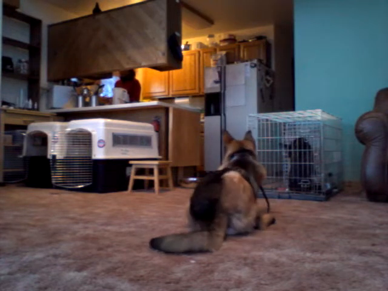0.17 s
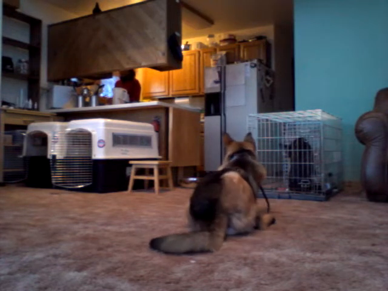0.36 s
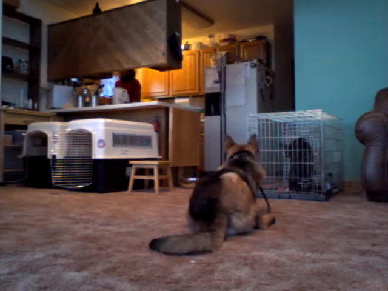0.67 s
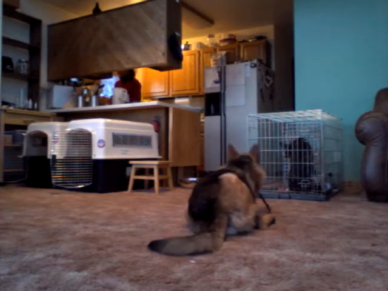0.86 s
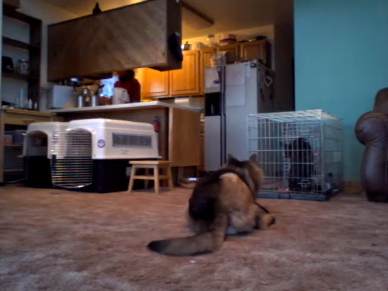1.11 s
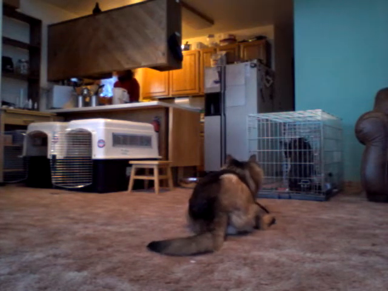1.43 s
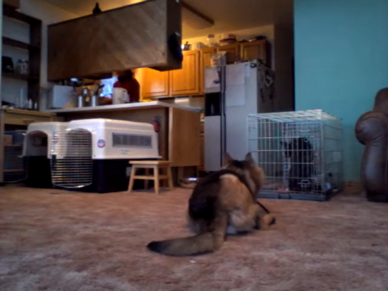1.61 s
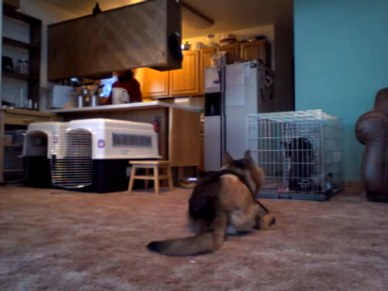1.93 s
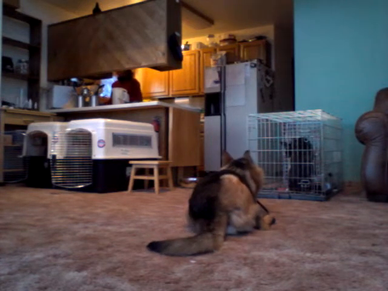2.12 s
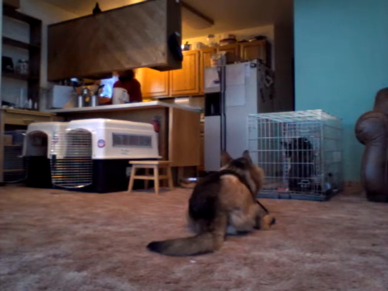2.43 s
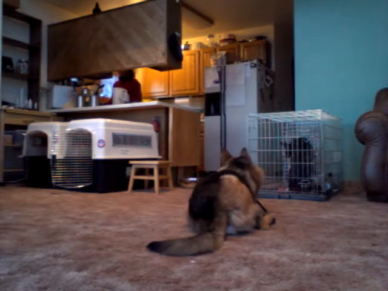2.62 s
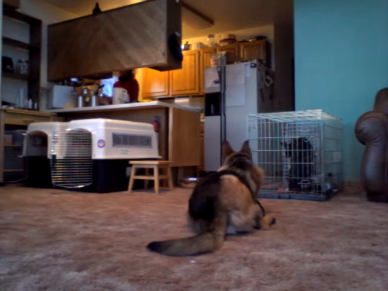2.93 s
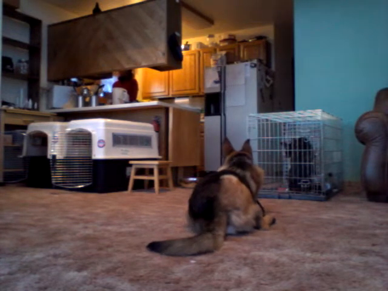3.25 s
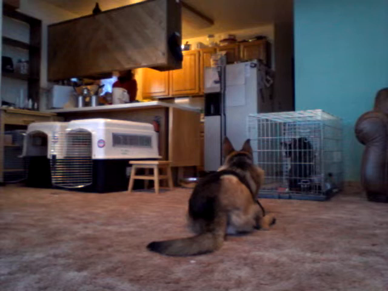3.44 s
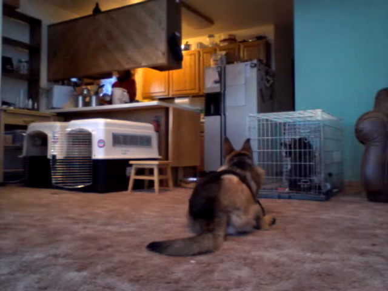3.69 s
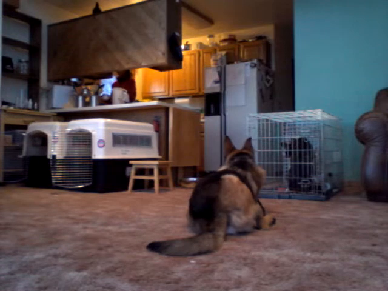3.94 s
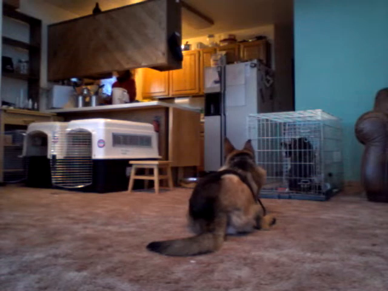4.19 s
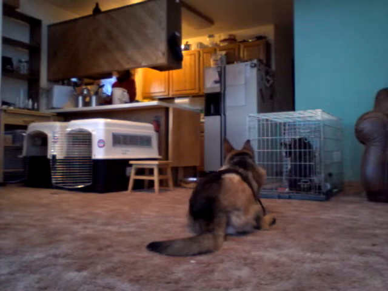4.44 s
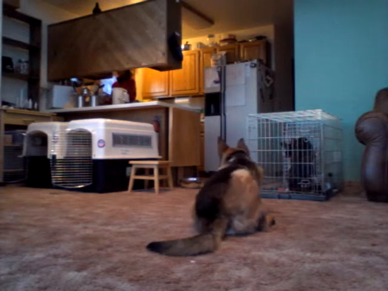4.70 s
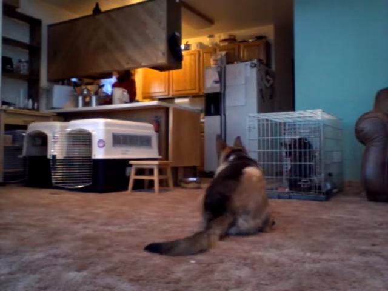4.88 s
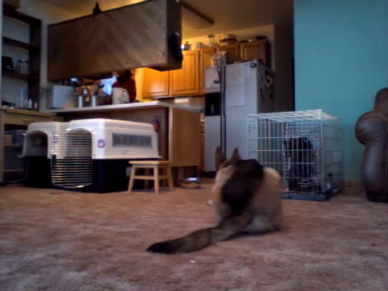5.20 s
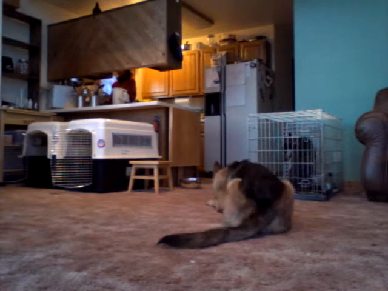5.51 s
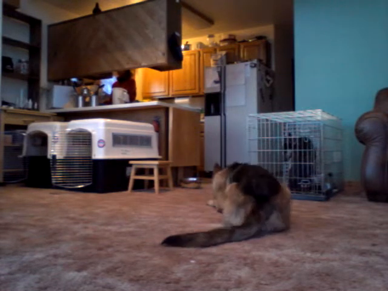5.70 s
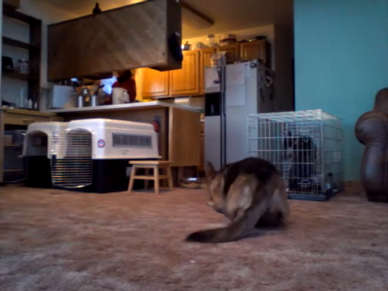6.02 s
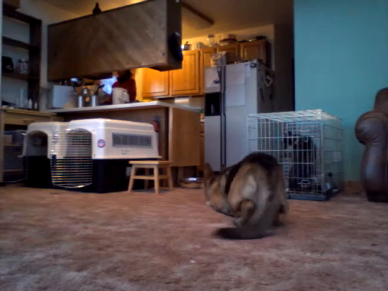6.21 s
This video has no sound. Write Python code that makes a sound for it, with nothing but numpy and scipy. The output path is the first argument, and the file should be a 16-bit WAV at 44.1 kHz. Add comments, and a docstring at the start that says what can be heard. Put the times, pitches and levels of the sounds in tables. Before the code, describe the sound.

Near, whistly dog whines come in short bursts, with muffled far-off knocks, faint collar tag chinks and soft room rumble behind.

```python
"""Nasal whimpers of a dog in a carpeted room

Paired nostril whistles near 4 kHz beat together, one short throat whine joins them, and weak jets squeak.
Far off in a kitchen, damped modes sound as things are knocked and a dish clinks, and a wooden panel booms.
Metal tags chink as decaying mode pairs; fur rustles as shaped noise; tiny ticks are resonated impulses.
Behind them lie room rumble, a wavering hum of narrow-band noise, and microphone hiss."""
import sys
import numpy as np
from scipy import signal
from scipy.fft import rfft, irfft
from scipy.io import wavfile
from scipy.ndimage import uniform_filter1d

SR = 44100
rng = np.random.default_rng(int(sys.argv[2]) if len(sys.argv) > 2 else 0)


def store_pcm(level_fs):
    """Save levels as 16-bit WAV."""
    pcm = np.round(np.clip(level_fs, -1, 1) * 32767).astype(np.int16)
    wavfile.write(sys.argv[1], SR, np.atleast_2d(pcm).T)


def natural_amplitude(level_db):
    """Convert a level in decibels to a linear amplitude factor, elementwise."""
    exponent = np.asarray(level_db, float) / 20
    return 10 ** exponent


N = 280035  # length [samples]


def evened(x):
    """Normalisation: scales a signal to rms 1."""
    return x / np.sqrt(np.mean(x ** 2) + 1e-20)


def drift(count, first, second):
    """Slow fluctuation: white noise averaged twice, over first and second samples, at rms 1."""
    return evened(uniform_filter1d(uniform_filter1d(rng.standard_normal(count), size=first), size=second))


def read(points, hz):
    """Interpolation of a spectrum on a log-frequency axis."""
    f, value = np.transpose(points)
    return np.interp(np.log(hz + 1), np.log(f + 1), value)


def add(mix, s, sound):
    """Superposition: adds a sound at time s [s]."""
    part = mix[round(s * SR):][:len(sound)]
    part += sound[:len(part)]


def curve(rows):
    """Linear interpolation of rows in time: the columns, and a fade at both ends (no fade-in from time 0)."""
    s, *columns = np.transpose(rows)
    t = np.arange(s[0], s[-1], 1 / SR)
    from_start = t - s[0] + (s[0] <= 0)
    fade = np.clip(np.minimum(from_start, s[-1] - t) / 0.0027, 0, 1)
    return [np.interp(t, s, c) for c in columns], fade


def tone(levels, pitch_hz, multiples, waver):
    """Harmonic synthesis: partials at rms levels [dB] share one phase, whose rate wavers by a fraction."""
    unsteady_hz = pitch_hz * (1 + waver * drift(len(pitch_hz), 160, 100))
    turns = np.cumsum(unsteady_hz) / SR + rng.random()
    partials = [natural_amplitude(db) * np.sin(2 * np.pi * k * turns) for k, db in zip(multiples, levels)]
    return np.sqrt(2) * sum(partials)


def resonate(x, hz, width_hz):
    """Resonance by heterodyning: shifts hz down to zero, smooths, and shifts back, with gain 1 at the peak."""
    turn = np.exp(2j * np.pi * hz * np.arange(len(x)) / SR)
    r = np.exp(-np.pi * width_hz / SR)
    return 2 * (turn * signal.lfilter([1 - r], [1, -r], x / turn)).real


def noise(spectrum, patchy_db):
    """Filtered noise: random short-time spectra with drifting patches in level, rms 1."""
    real, imaginary, patches = rng.standard_normal((N // 256 + 5, 513, 3)).T
    patches = evened(uniform_filter1d(uniform_filter1d(patches, size=10, axis=0), size=16, axis=1))
    shape_db = read(spectrum, np.fft.rfftfreq(1024, 1 / SR))[:, None]
    spectra = (real + 1j * imaginary) * natural_amplitude(shape_db + patchy_db * patches)
    return evened(signal.istft(spectra, nperseg=1024, noverlap=768)[1][:N])


def ring(modes, energy_db, tilt_db=0, rattle_s=0.002, split=0.0029):
    """Modal decay: each mode is a close pair, and a brief decaying burst of noise excites them all."""
    t = np.arange(SR // 3) / SR
    sound = 0
    for hz, db, t60 in modes:
        decay = natural_amplitude(db + tilt_db * np.log2(hz / 2500) - 60 * t / t60)
        pair = np.sin(2 * np.pi * (hz * t + rng.random())) * np.cos(2 * np.pi * split * hz * t)
        sound = sound + decay * pair
    rattle = rng.standard_normal(4000) * np.exp(-t[:4000] / rattle_s)
    sound = signal.fftconvolve(sound, rattle)
    return natural_amplitude(energy_db) * sound / np.linalg.norm(sound)


# Whistle pitches, one list a whimper: (time [s], upper whistle [Hz], lower whistle [Hz])
WHISTLE_PITCH = [
    [(0, 4055, 3945), (.1, 4060, 3940)],
    [(.31, 3330, 3300), (.35, 3500, 3450), (.43, 4015, 3955), (.66, 4005, 3940)],
    [(3.66, 3450, 3400), (3.725, 4057, 3945), (3.86, 4055, 3945), (3.89, 4090, 3900), (3.98, 4060, 3900)],
    [(4.14, 3400, 3380), (4.185, 3600, 3480), (4.22, 4070, 3800), (4.28, 4160, 3840), (4.33, 4125, 3880),
     (4.52, 4110, 3890)],
    [(4.6, 3460, 3430), (4.635, 3550, 3480), (4.675, 4060, 3940), (4.76, 4080, 3920), (4.81, 4080, 3920),
     (4.9, 4075, 3965)],
]
# Breath effort that sets the whistle levels, one list a whimper: (time [s], level [dB])
BREATH_EFFORT = [
    [(0, -54), (.04, -58), (.07, -75), (.1, -85)],
    [(.31, -86), (.35, -59.5), (.39, -69.5), (.43, -56), (.47, -61), (.505, -60), (.56, -56), (.6, -64.5),
     (.66, -78)],
    [(3.66, -83), (3.7, -63.5), (3.735, -49.5), (3.756, -41), (3.774, -39.5), (3.792, -58), (3.81, -40),
     (3.85, -36), (3.864, -43.5), (3.874, -49), (3.925, -54), (3.98, -71)],
    [(4.14, -89), (4.16, -66), (4.28, -49), (4.316, -58), (4.336, -38.5), (4.364, -42), (4.374, -61),
     (4.39, -41.5), (4.42, -54), (4.46, -81), (4.48, -63), (4.52, -71)],
    [(4.6, -94), (4.622, -54), (4.65, -63), (4.686, -52), (4.735, -67), (4.756, -46), (4.775, -46.5),
     (4.815, -54), (4.9, -70)],
]
# Lower whistle against the upper before a 1 dB offset, one value a whimper: (level [dB])
LOWER_WHISTLE_DB = [0.5, -2.5, 1.5, -12, -3.5]
# Lean of the octave, added for the upper nostril and taken from the lower, one value a whimper: (level [dB])
OCTAVE_LEAN = [0, 11, -4, 8, 6.5]


def whistles():
    """Jet oscillation: two nostril whistles slide up, wavering, then lock a little apart and beat."""
    lock_hz, lock_width_hz = 3900, 150
    steady, unsteady = .0015, .022  # relative pitch waver when locked and when loose
    out = np.zeros(N)
    for pitch, rows, lower_db, lean_db in zip(WHISTLE_PITCH, BREATH_EFFORT, LOWER_WHISTLE_DB, OCTAVE_LEAN):
        start = rows[0][0]
        (effort_db,), fade = curve(rows)
        t = np.arange(len(fade)) / SR
        s, *both_hz = np.transpose(pitch)
        upper_hz, lower_hz = (np.interp(start + t, s, hz) for hz in both_hz)
        loose = np.clip((lock_hz - upper_hz) / lock_width_hz, 0, 1)
        # A weak jet loses its grip on the pitch
        weak = np.clip((-52 - effort_db) / 20, 0, 1)
        waver = steady + (unsteady - steady) * loose + .007 * weak
        # The octave follows effort only in part, and is weaker while the whistle is loose
        octave_db = -70 + 0.71 * (effort_db + 44.5) - 20 * loose
        upper = tone([effort_db - 3, octave_db + lean_db], upper_hz, (1, 2), waver)
        lower = tone([effort_db - 2 + lower_db, octave_db - lean_db], lower_hz, (1, 2), waver)
        add(out, start, fade * upper)
        add(out, start, fade * lower)
        # The low mode that a loose whimper starts on lingers
        first_db = np.minimum(-61.5 - 60 * t / 0.48, effort_db)
        first = tone([first_db], 3430 + 0 * t, (1,), 0.0098)
        add(out, start, loose[0] * fade * first)
    return out


# Throat whine: (time [s], pitch [Hz], level [dB], octave relative to the fundamental [dB])
THROAT_WHINE = [(4.73, 592, -74, -25), (4.762, 587, -42, -22), (4.784, 578, -39, -20),
                (4.789, 535, -49, -10), (4.805, 545, -47, -8), (4.825, 582, -52, -3), (4.875, 580, -64, -2)]


def whine():
    """Vocal-fold oscillation: one voiced note with harmonics 1, 2 and 4 breaks to a lower, weaker note."""
    out = np.zeros(N)
    (hz, db, octave_db), fade = curve(THROAT_WHINE)
    fourth_db = -36.5 - 0.6 * octave_db  # the fourth harmonic fades as the octave grows
    waver = .006 + .03 * natural_amplitude(octave_db)
    note = tone([db, db + octave_db, db + fourth_db], hz, (1, 2, 4), waver)
    add(out, THROAT_WHINE[0][0], fade * note)
    return out


def dog():
    """Amplitude modulation: turbulence frays the whistles, the folds chop their air, the nose low-passes this."""
    folds, air = whine(), whistles()
    fray = drift(N, 90, 70)
    side = air * (.3 * folds / abs(folds).max() + .15 * fray)
    nose = signal.butter(12, 4000, fs=SR, output="sos")  # passes the side tones below the whistles
    return air + signal.sosfilt(nose, side) + folds * (1 + .25 * fray)


# Faint squeaks: (start [s], length [s], start pitch [Hz], end pitch [Hz], peak level [dB])
SQUEAK_GLIDES = [(1.93, .06, 4440, 4470, -63), (5.025, .13, 4390, 4290, -65), (5.075, .1, 3380, 3580, -61),
                 (5.17, .1, 3640, 3900, -66), (5.42, .09, 4290, 4270, -63)]


def unsteady_jets():
    """Unstable jet oscillation: a quick swell, a slower fade, the pitch sliding and wavering."""
    rise = 0.22  # fraction of the length
    out = np.zeros(N)
    for s, length, from_hz, to_hz, db in SQUEAK_GLIDES:
        peak_hz = from_hz + rise * (to_hz - from_hz)
        (hz, level), fade = curve([(s, from_hz, db - 23),
                                   (s + rise * length, peak_hz, db),
                                   (s + length, to_hz, db - 19.5)])
        add(out, s, fade * tone([level], hz, (1,), .018))
    return out


# Cabinet response: (frequency [Hz], relative gain [dB])
CABINET_RESPONSE = [(30, -47), (55, -20.5), (125, -20), (300, -12.5), (700, -14.5), (1100, -24),
                    (1400, -25.5), (1800, -22.5), (2400, -25.5), (3100, -34), (4200, -27.5), (5700, -32.5),
                    (8000, -23.5), (12000, -34.5), (16000, -49)]
# Frequencies at which each knock's own colour is set: (frequency [Hz])
COLOUR_HZ = [130, 550, 2000, 7000]


def knock(energy_db, length_s, *colour_db):
    """Impact on a minimum-phase body: a push in the bass and a short rattle above, coloured causally."""
    hz, t = np.fft.rfftfreq(4096, 1 / SR), np.arange(3000) / SR
    gain_db = read(CABINET_RESPONSE, hz) + read(list(zip(COLOUR_HZ, colour_db)), hz)
    # The Hilbert transform of the log gain gives the phase of a causal body
    log_gain = np.log(natural_amplitude(gain_db))
    circle = np.r_[log_gain, log_gain[-2:0:-1]]
    body = np.fft.ifft(np.exp(np.conj(signal.hilbert(circle)))).real[:2048]
    rattle = rng.standard_normal(3000) * np.exp(-t / length_s) * (1 - 0.333 * np.exp(-t / 0.0033))
    # The rattle's spectrum is partly flattened, so the body sets the colour
    spectrum = rfft(rattle)
    rattle = irfft(spectrum / abs(spectrum) ** .7)
    rattle = rattle / np.linalg.norm(rattle)
    impulse = signal.unit_impulse(3000, round(.6 * length_s * SR))
    push = signal.sosfilt(signal.butter(2, 500, fs=SR, output="sos"), impulse)
    rattle = signal.sosfilt(signal.butter(2, 500, "high", fs=SR, output="sos"), rattle)
    sound = np.convolve(push + rattle, body)
    return natural_amplitude(energy_db) * sound / np.linalg.norm(sound)


SHARP_S = 0.0053  # contact length of a sharp blow [s]
# Knocks: (time [s], relative energy [dB], contact length [s], bass colour [dB], treble colour [dB])
KNOCK_EVENTS = [(0.384, -16, 0.0049, -17, -3), (.961, 9, 0.0058, 0.5, -12),
                (1.273, -10.5, 0.00976, -33.5, -9.5), (1.606, -39, 0.0018, 1, -8),
                (1.905, 0, 0.027, 7.5, -27.5), (2.467, -19, 0.034, -6, 33), (2.621, -15.5, 0.03, 9.5, -4.5),
                (3.191, -30.5, 0.013, -14, 20), (6.099, -20.5, 0.031, 24, -23)]
# Dish clinks: (time [s], relative energy [dB], treble tilt [dB per octave])
CLINK_EVENTS = [(2.467, -13.5, -2.5), (2.622, -21.5, 6), (3.191, -32.5, 14)]
# Modes of the dish: (frequency [Hz], level before tilt [dB], t60 [s])
DISH_MODES = [(1595, -0.5, 0.051), (2495, -2, 0.21), (3870, -9.5, 0.076), (5690, -8, 0.021),
              (7300, -10, 0.077), (7480, -17, 0.039), (8500, -20, 0.013), (9570, -14, 0.028),
              (11200, -18, 0.034)]


def kitchen():
    """Impact excitation: far knocks lose presence as contact lengthens, and clinks ring the dish modes."""
    out = np.zeros(N)
    for s, energy_db, length_s, bass_db, treble_db in KNOCK_EVENTS:
        presence_db = 6 - 3 * np.log2(length_s / SHARP_S)
        add(out, s, knock(energy_db, length_s, bass_db, 0, presence_db, treble_db))
    for s, energy_db, tilt_db in CLINK_EVENTS:
        add(out, s, ring(DISH_MODES, energy_db, tilt_db, rattle_s=0.0047, split=0.0033))
    return out


# Modes of the wooden panel: (frequency [Hz], level before tilt [dB], t60 [s])
PANEL_MODES = [(222.3, -6.5, 0.16), (305, -3, 0.4), (646, -12.5, 0.29), (1090, -7, 0.24)]


def panel():
    """Sympathetic modal response: a wooden panel booms after each knock, less for longer contact."""
    out = np.zeros(N)
    for s, energy_db, length_s, bass_db, _ in KNOCK_EVENTS:
        boom_db = energy_db - 6 - 0.085 * bass_db - 2.5 * np.log2(length_s / SHARP_S)
        tilt_db = -0.27 * bass_db  # knocks with little bass ring the upper modes more
        boom = ring(PANEL_MODES, boom_db, tilt_db, rattle_s=0.00044, split=0.0094)
        add(out, s + length_s / 2, boom)
    return out


# Chinks of the first tag: (time [s], energy [dB])
FIRST_CHINKS = [(.865, -29.5), (.894, -25.5)]
# Modes of the first tag: (frequency [Hz], relative level [dB], t60 [s])
FIRST_TAG_MODES = [(8680, -9, .08), (10400, 0, .12), (11900, -4, .1)]
# Chinks of the second tag: (time [s], energy [dB])
SECOND_CHINKS = [(6.11, -41), (6.148, -28.5), (6.219, -29), (6.26, -36)]
# Modes of the second tag: (frequency [Hz], relative level [dB], t60 [s])
SECOND_TAG_MODES = [(7050, 0, .2), (8120, -6, .12), (8550, -9, .1), (8730, -3, .2), (11800, -15, .05)]


def tags():
    """Free vibration of small plates: collar tags touch and ring."""
    out = np.zeros(N)
    for chinks, modes in (FIRST_CHINKS, FIRST_TAG_MODES), (SECOND_CHINKS, SECOND_TAG_MODES):
        for s, energy_db in chinks:
            add(out, s, ring(modes, energy_db, rattle_s=.02))
    return out


# Runs of ticks: (start [s], length [s], mean peak level [dB])
TICK_TRAINS = [(3.7463, 0, -47), (3.9897, 0, -49.5), (4.016, .066, -48), (4.127, 0, -53), (4.172, .04, -50),
               (4.244, .018, -49), (4.287, .024, -46), (4.367, 0, -46)]


def ticks():
    """Impulse response of a broad resonance: dry clicks of a few treble cycles, in slightly uneven runs."""
    gap_s, jitter_s, spread_db = .0084, .0009, 2.5
    click = resonate(signal.unit_impulse(150), 9900, 790)
    click = resonate(click, 1.3 * 9900, 5100)
    click = click / abs(click).max()
    out = np.zeros(N)
    for start, length, peak_db in TICK_TRAINS:
        for k in range(round(length / gap_s) + 1):
            late, louder = rng.standard_normal(2)
            s = start + k * gap_s + (k > 0) * jitter_s * late
            add(out, s, natural_amplitude(peak_db + spread_db * louder) * click)
    return out


# Stirring of the fur, one list a spell: (time [s], level [dB])
FUR_LEVEL = [
    [(0.0, -69.5), (0.214, -80), (0.3, -98)],
    [(0.72, -81), (0.858, -64.5), (0.95, -66)],
    [(3.65, -88), (3.75, -63.5), (3.88, -69), (4.22, -70), (4.31, -68.5), (4.48, -74), (4.75, -70),
     (4.88, -73), (5.6, -81), (6.2, -69.5), (6.32, -65.5), (6.35, -67)],
]
# Spectrum of the fur: (frequency [Hz], relative density [dB])
FUR_SPECTRUM = [(880, -14), (1500, 4), (2460, -12), (3880, -10), (4330, -46), (5770, -7), (8490, 7),
                (16000, -2)]


def rustle():
    """Friction noise: fur hisses faintly while the dog stirs."""
    level = np.zeros(N)
    for rows in FUR_LEVEL:
        (db,), fade = curve(rows)
        add(level, rows[0][0], natural_amplitude(db) * fade)
    return level * noise(FUR_SPECTRUM, 2.7)


# Spectrum of the rumbling air: (frequency [Hz], relative density [dB])
AIR_SPECTRUM = [(12, -47), (20, -35.5), (60, 3.5), (87, -12), (240, -9), (260, -13.5), (345, -6),
                (431, -13.5), (686, -15.5), (1050, -23), (1180, -26.5), (2500, -35.5), (3250, -67),
                (5500, -120)]
# Swell of the rumble: (time [s], level of its air noise [dB])
RUMBLE_LEVEL = [(0.0, -56), (0.83, -61.5), (1.17, -58), (1.41, -60.5), (4.08, -62), (6.35, -58.5)]
# Room modes in the rumble: (frequency [Hz], bandwidth [Hz], level relative to the air noise [dB])
ROOM_MODES = [(120.5, 12.2, -9.5), (194.2, 7.9, -10), (342, 80, -11)]
# Wavering hum: (time [s], level [dB])
HUM_LEVEL = [(0.0, -66), (0.69, -84), (0.96, -62), (2.05, -67), (2.3, -68), (3.0, -74), (3.18, -65),
             (4.78, -70), (5.15, -60.5), (6.1, -71), (6.35, -88)]
# Spectrum of the hiss: (frequency [Hz], relative density [dB])
HISS_SPECTRUM = [(1180, -31), (2000, -7), (2220, -8), (2500, -1), (3940, -4.5), (4760, -15.5), (6660, -8.5),
                 (9080, -1.5), (15600, -5)]


def background():
    """Stationary noise under slow envelopes: microphone hiss, rumble with room modes, and a wavering hum."""
    t = np.arange(N) / SR
    air = noise(AIR_SPECTRUM, 3.45)
    for hz, width_hz, db in ROOM_MODES:
        air = air + natural_amplitude(db) * evened(resonate(rng.standard_normal(N), hz, width_hz))
    rumble = natural_amplitude(np.interp(t, *np.transpose(RUMBLE_LEVEL))) * air
    hum_hz, hum_width_hz = 55.3, 12
    hum = resonate(rng.standard_normal(N), hum_hz, hum_width_hz)
    hum = evened(resonate(hum, hum_hz, hum_width_hz))
    hum = natural_amplitude(np.interp(t, *np.transpose(HUM_LEVEL))) * hum
    hiss = natural_amplitude(-73.5) * noise(HISS_SPECTRUM, 1.485)
    return hiss + rumble + hum


# Reverberation time of the room: (frequency [Hz], t60 [s])
ROOM_T60 = [(80, 0.48), (300, 0.33), (1500, 0.34), (4000, 0.42), (10000, 0.46)]


def room(x, rise_s):
    """Diffuse reverberation: dense reflections build up over rise_s and die band by band; energy 1."""
    hz, t, z = signal.stft(rng.standard_normal(SR), SR, nperseg=256)
    decay = natural_amplitude(-60 * t / read(ROOM_T60, hz)[:, None])
    tail = signal.istft(z * decay, SR, nperseg=256)[1]
    tail = tail * (1 - np.exp(-np.arange(len(tail)) / SR / rise_s))
    return signal.fftconvolve(x, tail / np.linalg.norm(tail))[:N]


def scene():
    """Direct-to-reverberant balance: the dog is near, the kitchen is heard mostly through the room."""
    near, jets, far = dog() + tags(), unsteady_jets(), kitchen()
    near_echo = room(natural_amplitude(-11) * near + natural_amplitude(-9) * jets, .004)
    far_off = natural_amplitude(-10) * far + room(far, 0.0023)
    mix = near + jets + near_echo + far_off + panel() + ticks() + rustle() + background()
    return mix[None]


def top_cut(x):
    """Nothing passes above the cut-off."""
    return signal.sosfilt(signal.butter(12, 16470, fs=SR, output="sos"), x)


def record(dry):
    """Band limitation: a linear-phase low-pass at 15750 Hz ends the treble."""
    edge = signal.firwin(255, 15750, window=("kaiser", 8), fs=SR)
    mix = signal.oaconvolve(dry, edge[None], "same")
    return top_cut(mix)


dry = scene()
out = record(dry)
store_pcm(out)
```